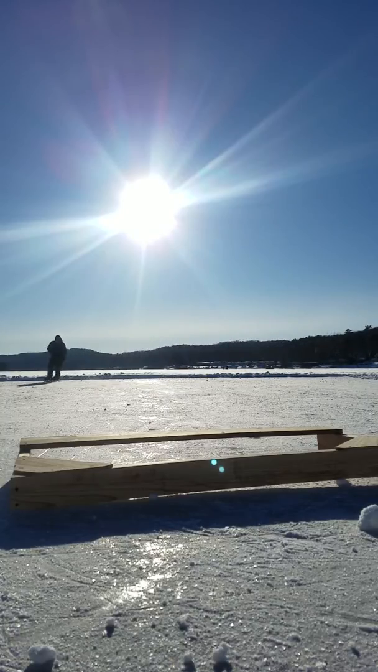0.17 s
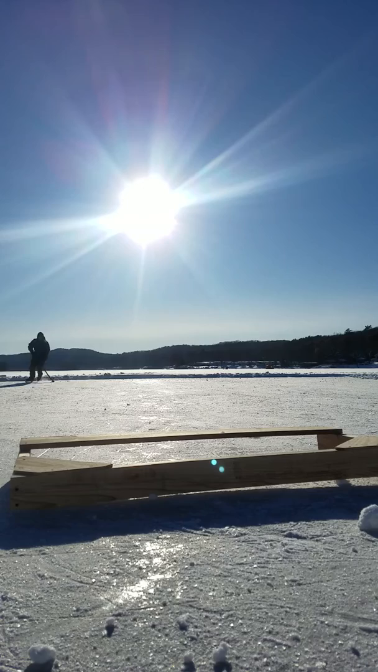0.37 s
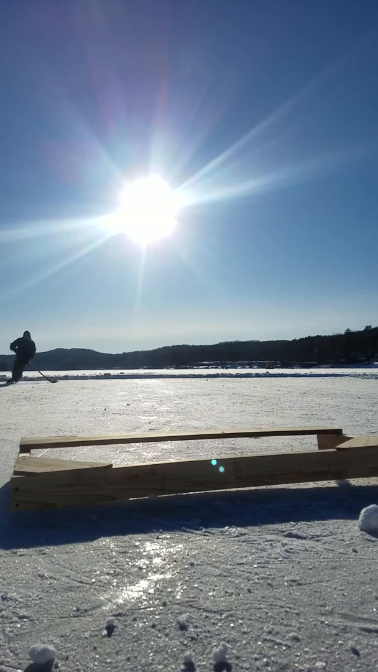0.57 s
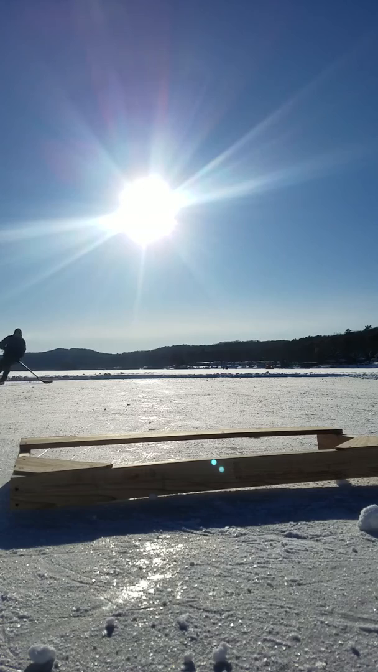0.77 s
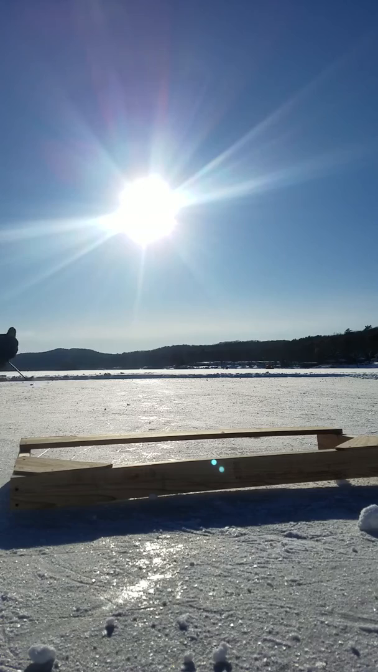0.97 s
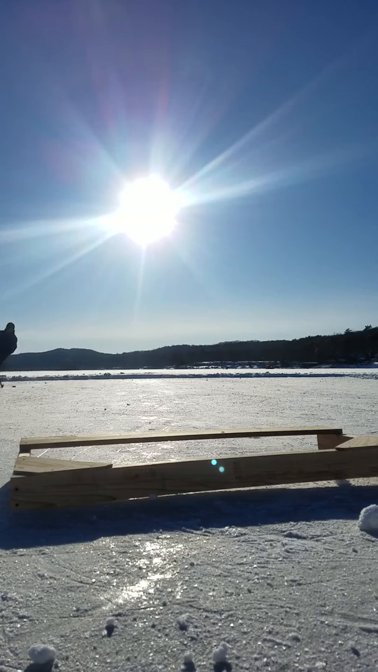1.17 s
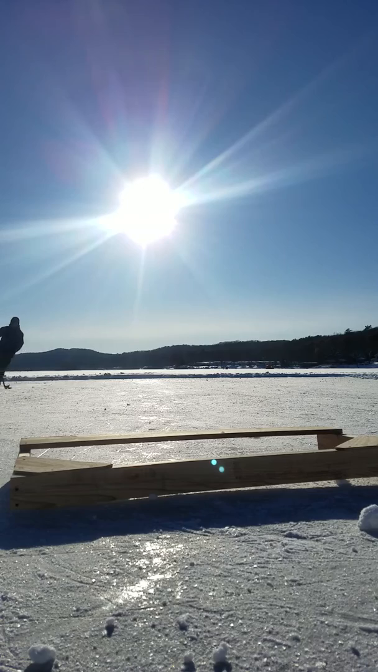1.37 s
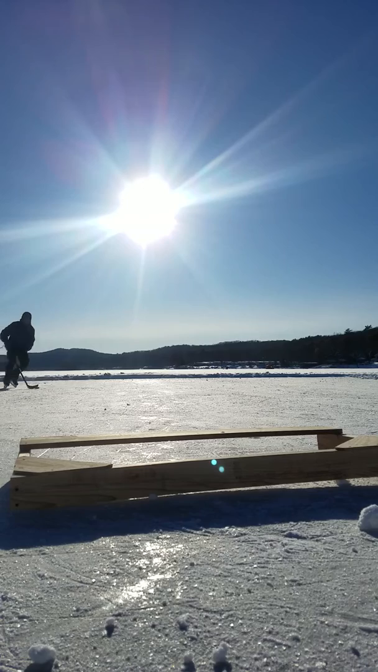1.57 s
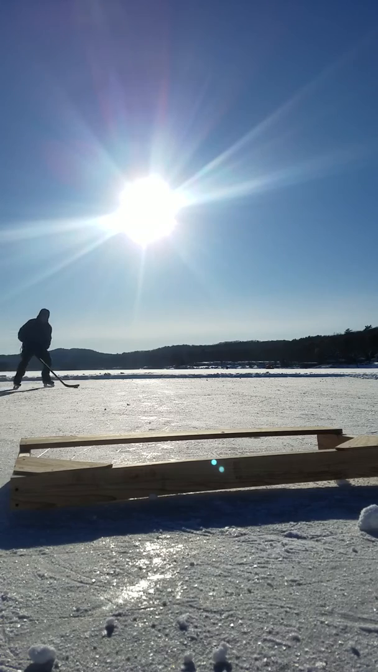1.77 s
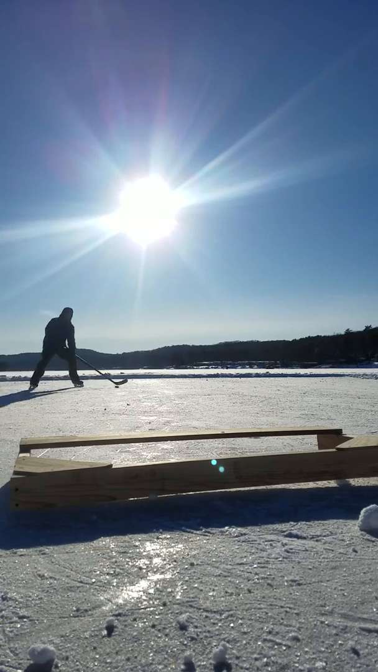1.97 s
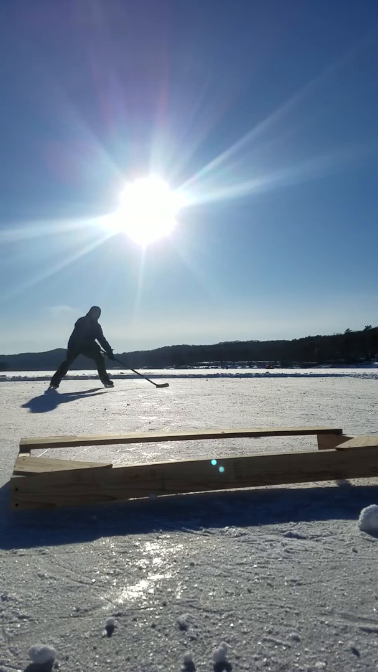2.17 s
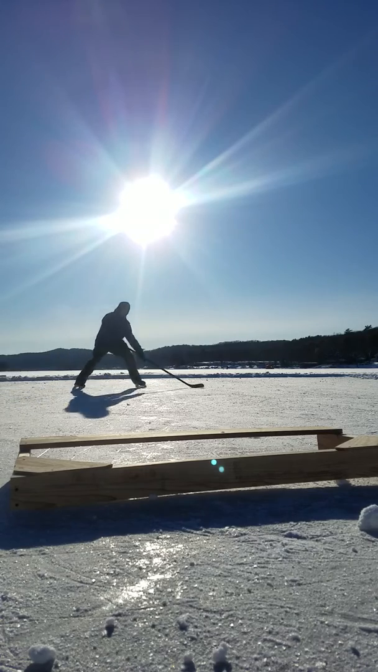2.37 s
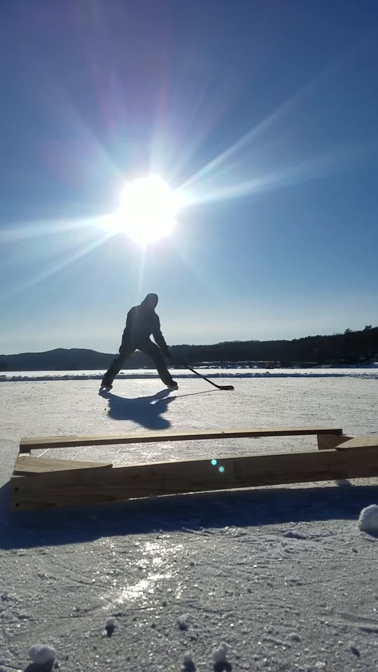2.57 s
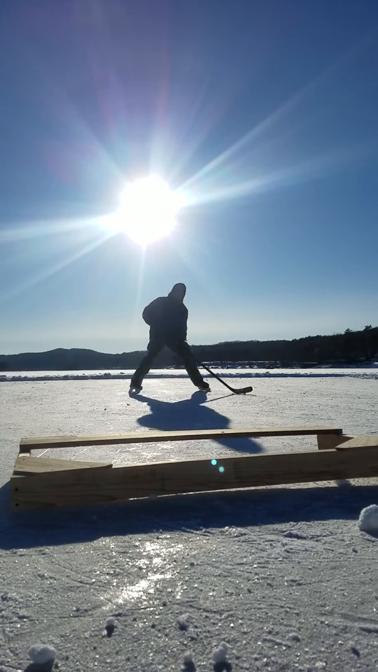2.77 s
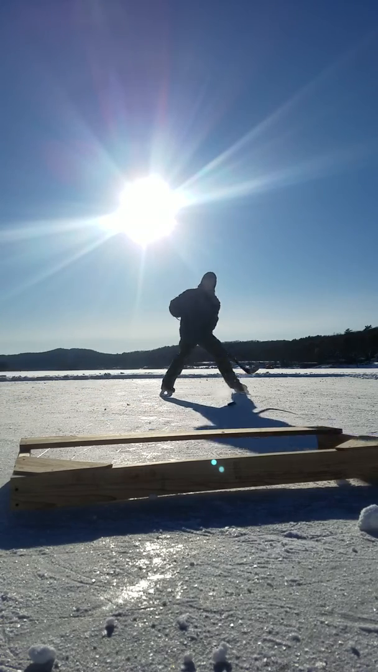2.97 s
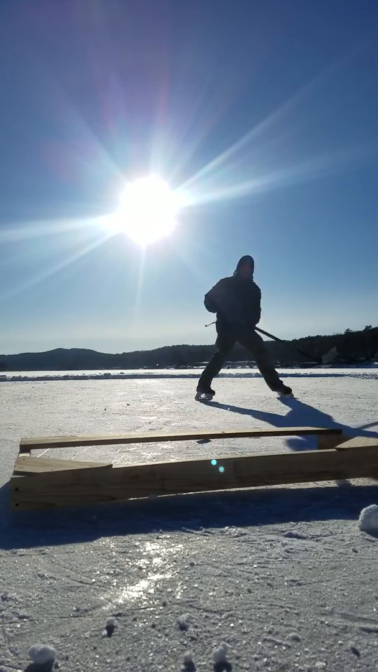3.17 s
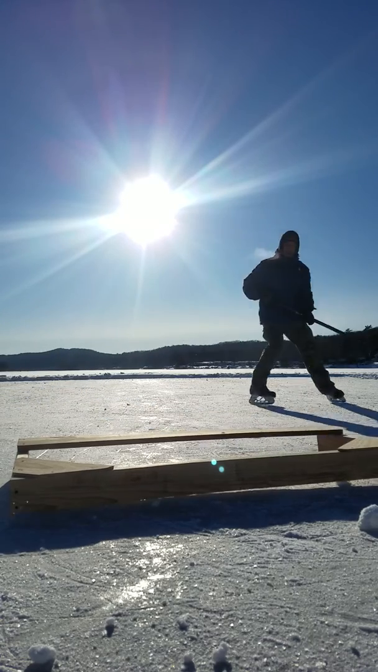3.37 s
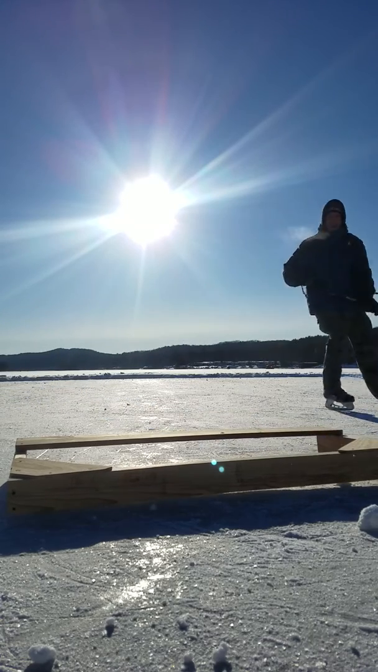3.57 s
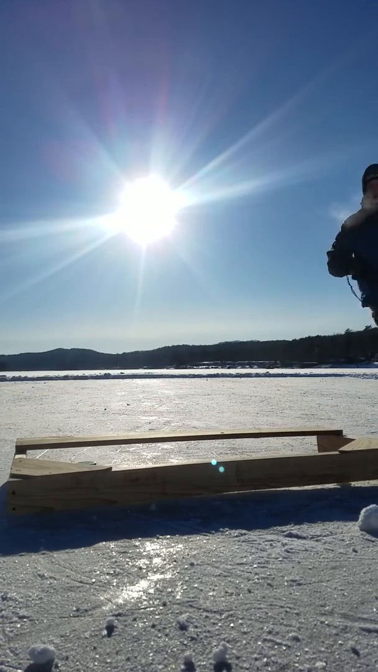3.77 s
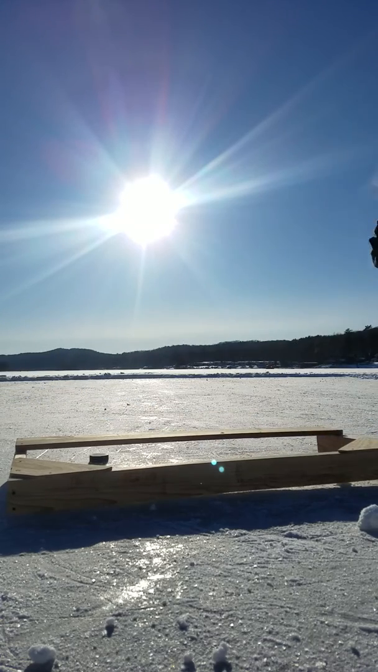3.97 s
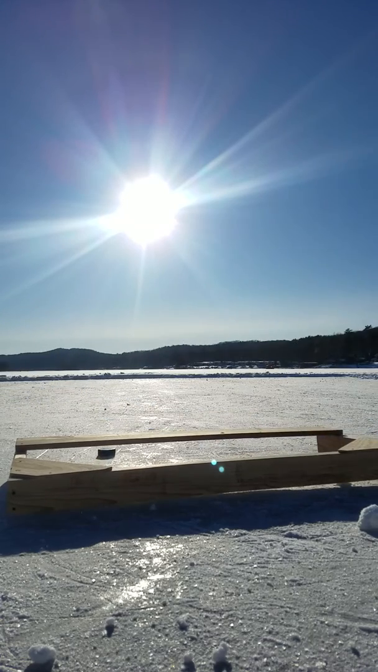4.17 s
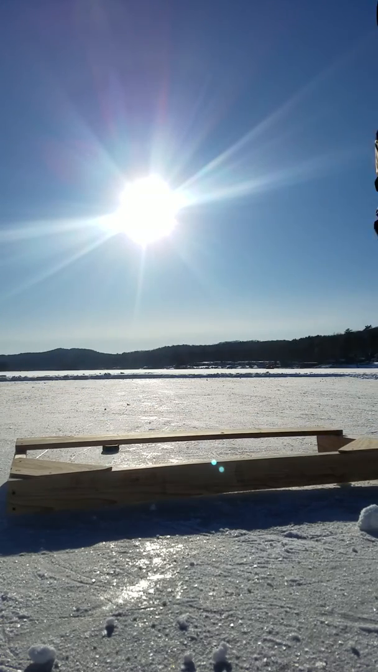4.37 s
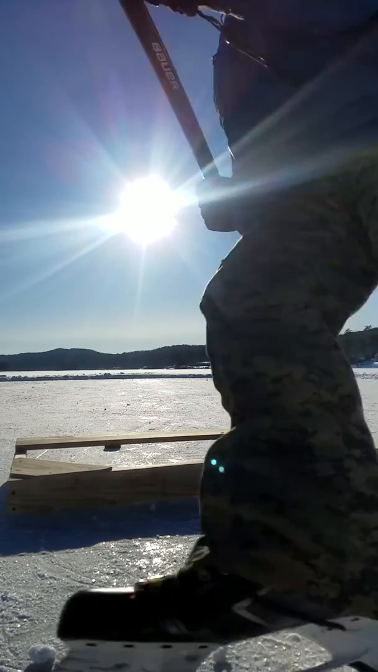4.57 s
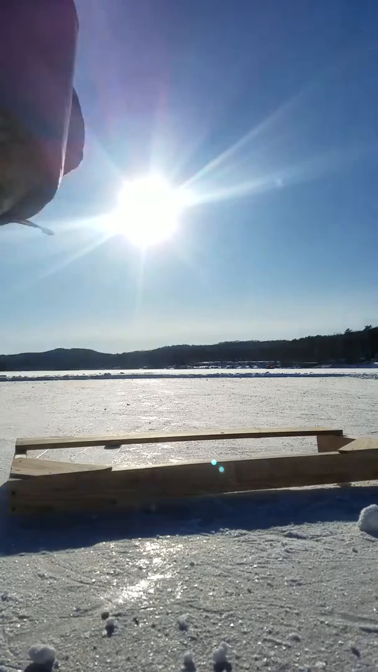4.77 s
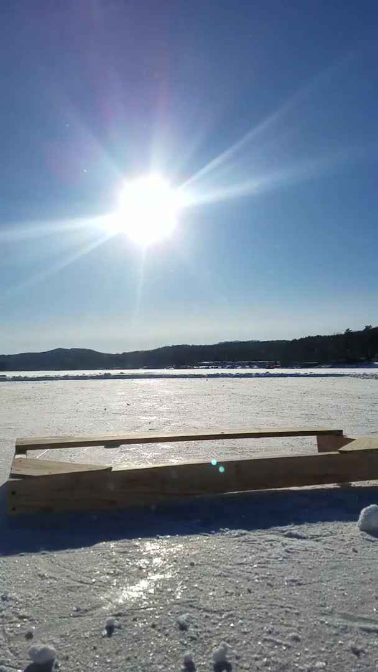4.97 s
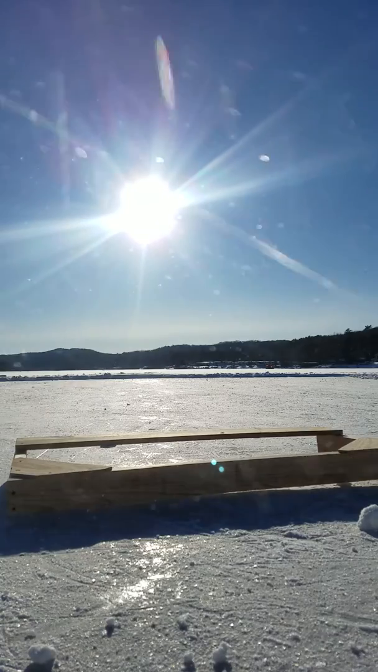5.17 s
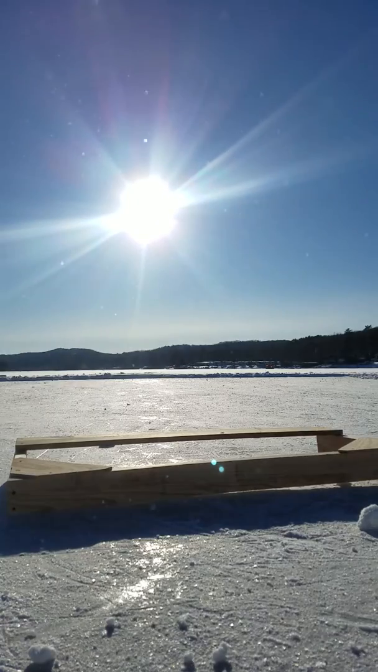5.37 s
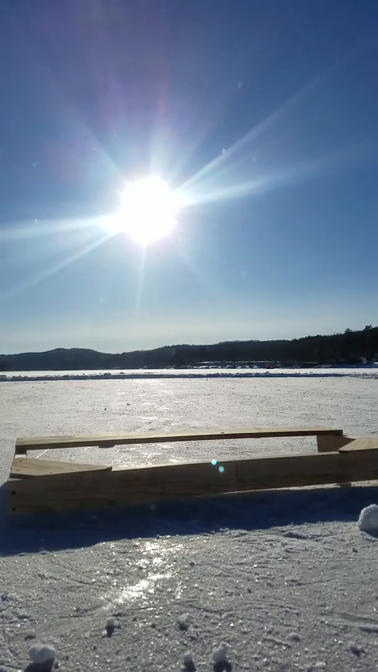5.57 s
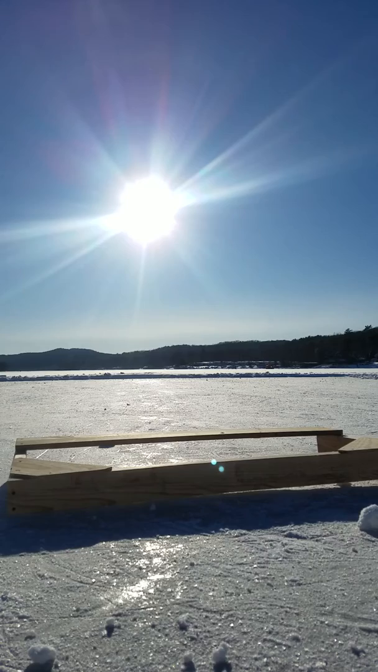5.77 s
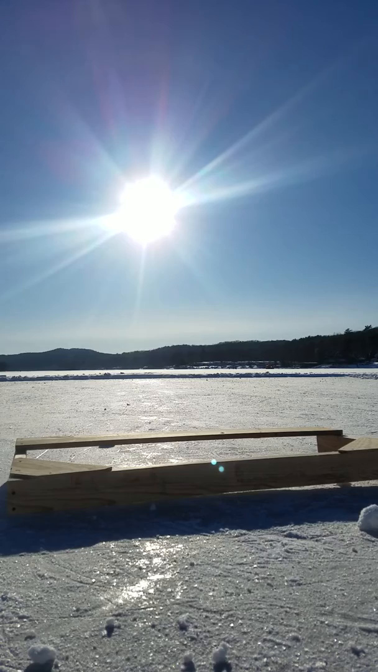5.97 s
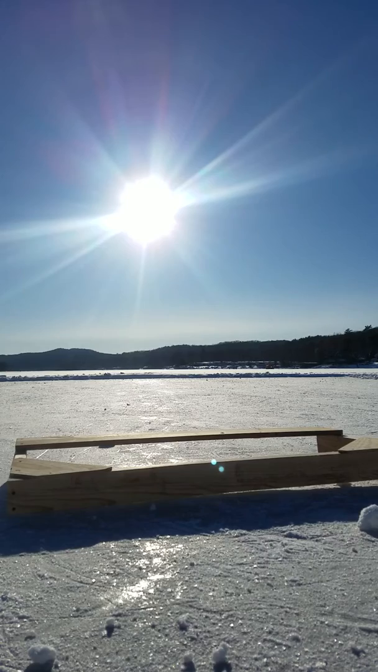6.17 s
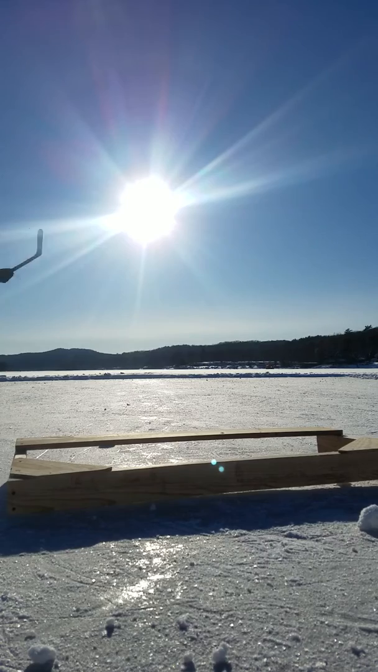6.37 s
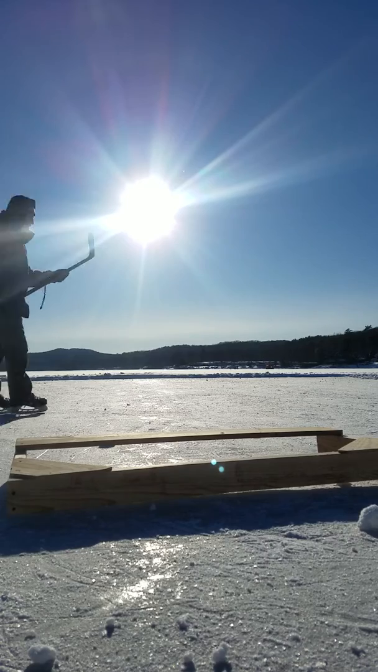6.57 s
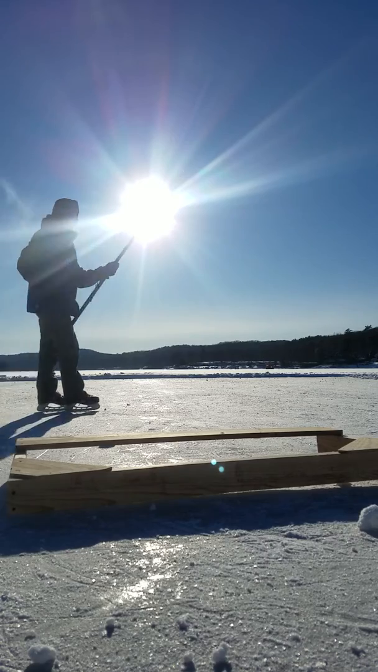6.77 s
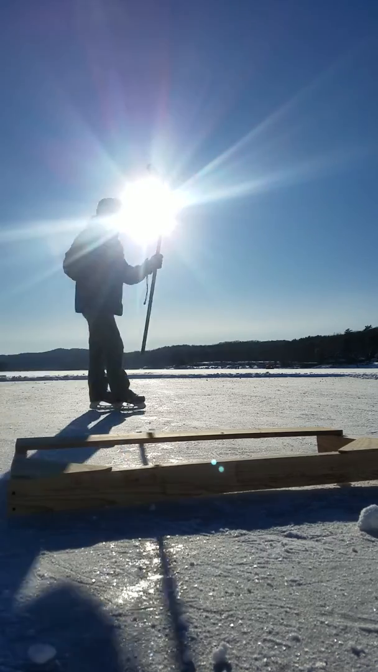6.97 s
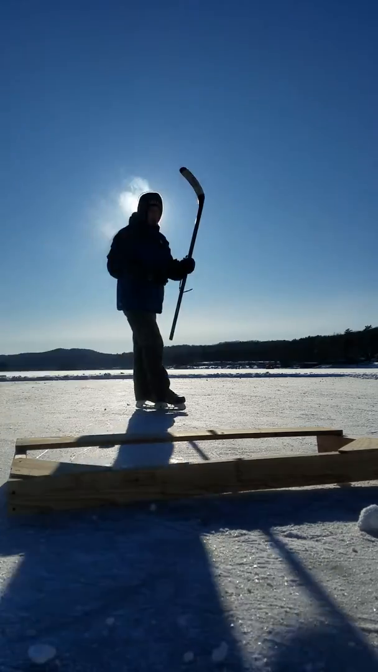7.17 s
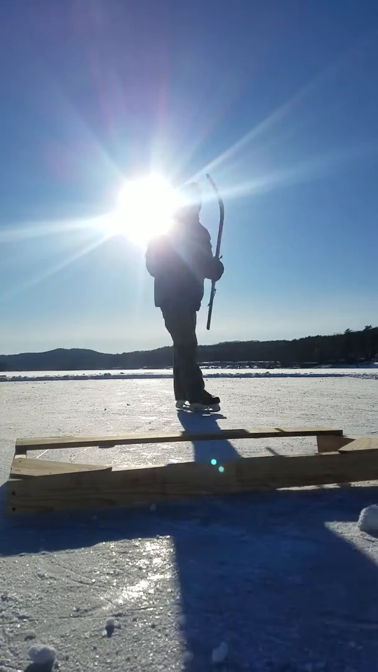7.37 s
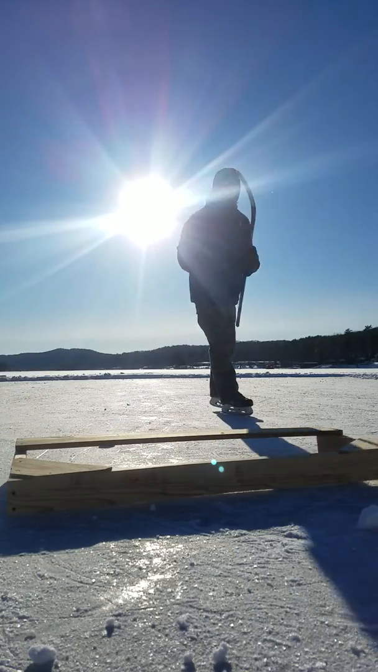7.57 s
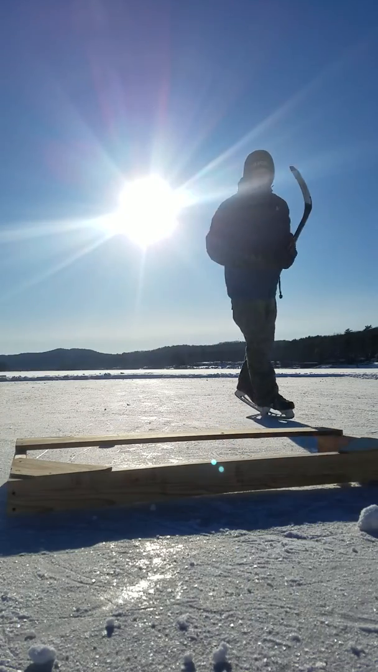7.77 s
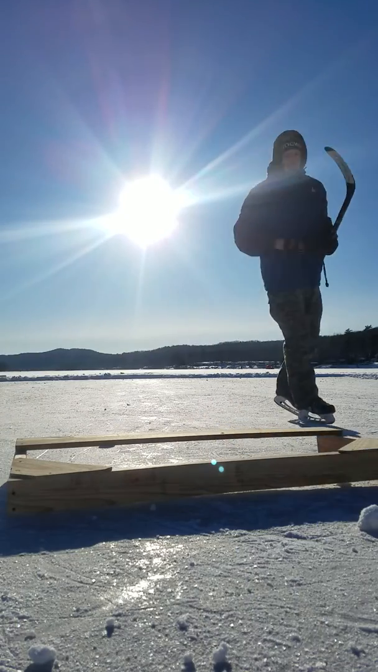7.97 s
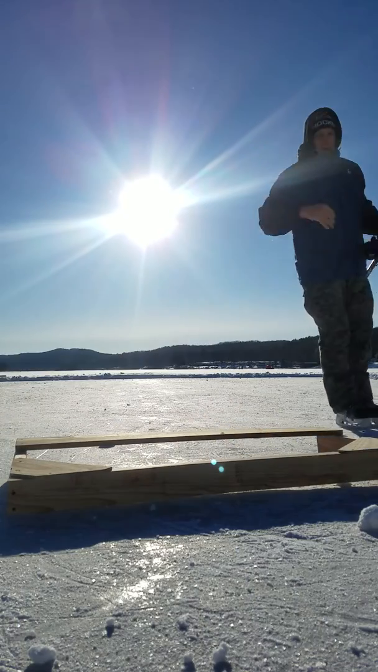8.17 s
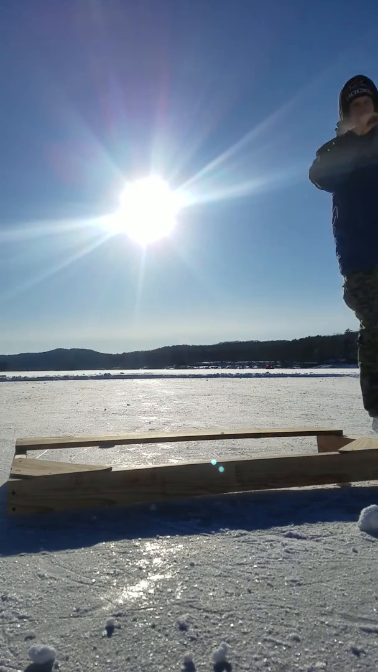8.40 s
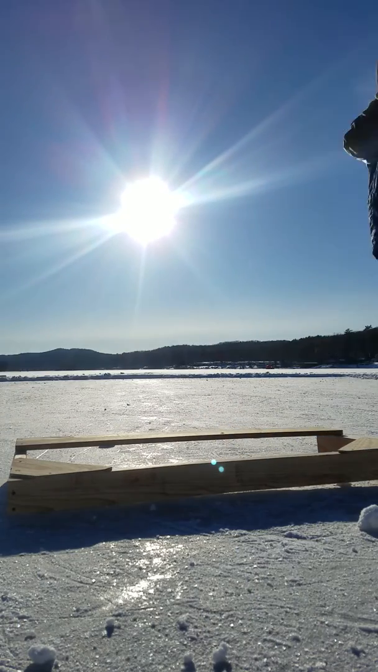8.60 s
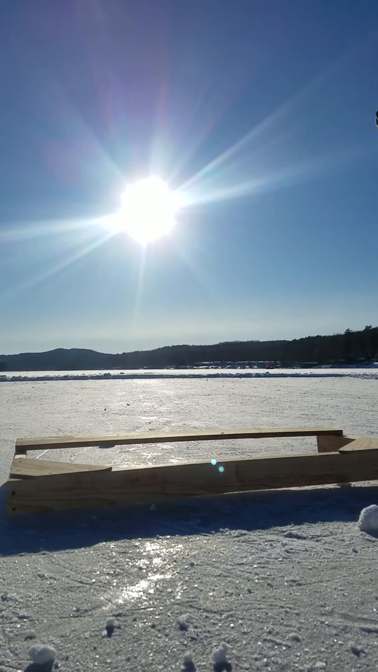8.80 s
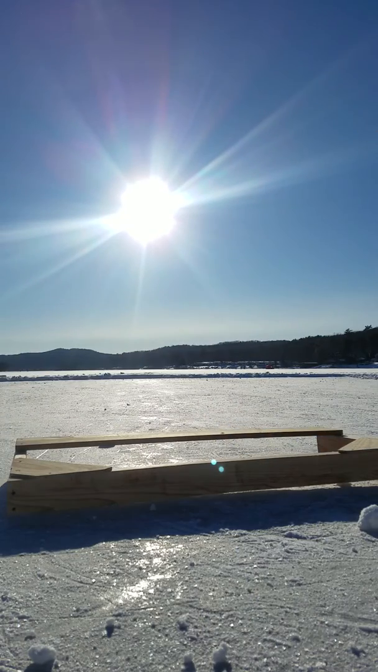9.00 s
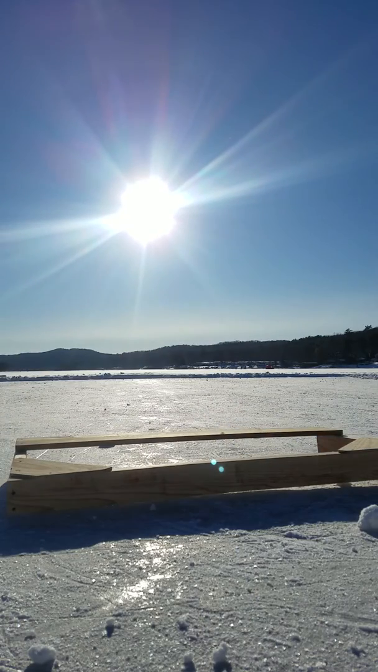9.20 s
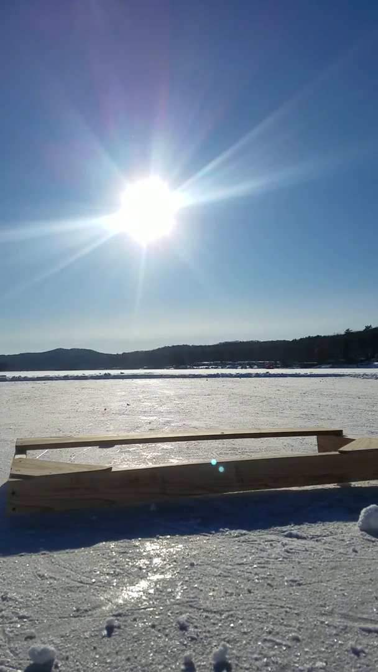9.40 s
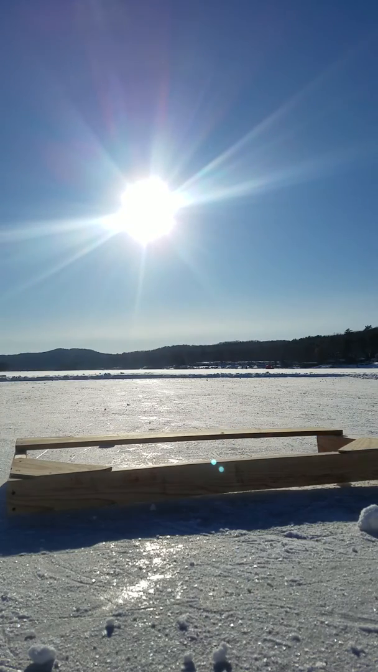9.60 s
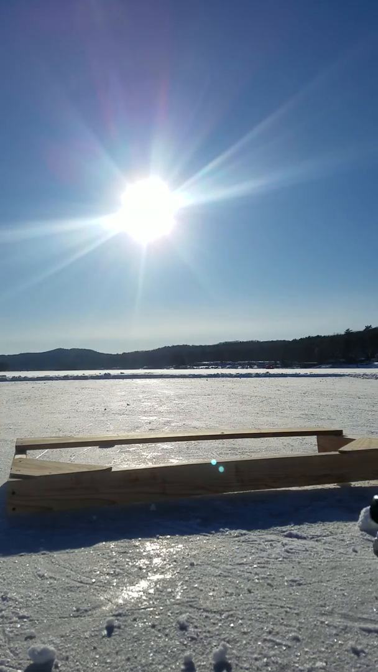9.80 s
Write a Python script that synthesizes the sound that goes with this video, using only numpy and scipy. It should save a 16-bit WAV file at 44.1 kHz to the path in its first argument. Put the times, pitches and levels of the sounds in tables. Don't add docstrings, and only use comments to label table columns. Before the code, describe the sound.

An open frozen lake, dry and echo-free, with faint low hiss and a light breeze. From 0 to 3.3 seconds a skater approaches: soft gritty blade strokes around 0.3, 0.7, 1.7 and 2.5, small ice clicks and bites, and a rapid, distant chatter at 0.9-1.5. At 3.35 a puck hits a wooden plank, a very loud, short hollow knock, with a weaker bounce at 3.47. After a brief lull, blades judder from 4.1 and carve into a loud, harsh, crunching stop peaking near 4.5-5.0, with chunks cracking. Scrapes and bites diminish through 6.5 while wind buffets low, mostly left, strongest around 5.5-5.9. About 6.7-7.6 is quiet, with a faint blade ring near 6.9 and tiny ticks. From 7.7 slow steps click, crackle and crunch; short, stuttering scrapes cluster at 8.6-9.5, then fade by 9.8.

```python
import sys
import numpy as np
from scipy import signal
from scipy.fft import rfft, irfft
from scipy.io import wavfile
from scipy.ndimage import uniform_filter1d, map_coordinates

SR = 44100
rng = np.random.default_rng(int(sys.argv[2]) if len(sys.argv) > 2 else 0)


def store_pcm(level_fs):
    pcm = np.round(np.clip(level_fs, -1, 1) * 32767).astype(np.int16)
    wavfile.write(sys.argv[1], SR, np.atleast_2d(pcm).T)


def attenuation_scalar(level_db):
    decades = np.asarray(level_db, float) / 20
    return 10 ** decades


N = 433944

# hardest moment in seconds,
# rise in seconds, fall in seconds, pressure in dB, weight on the ice sheet in dB.
STROKES = [(.34, 0.15, 0.27, -40.5, -1.5), (.74, 0.25, 0.17, -38.5, -1.5), (1.11, 0.27, 0.2, -43, 0),
           (1.28, 0.049, 0.5, -38.5, 0.5), (1.74, 0.12, 0.1, -39, 3.5), (2.15, 0.73, 0.29, -41.5, -3),
           (2.55, 0.46, 1, -39, -1), (3.15, 0.4, 0.4, -41, 2), (3.6, 0.16, 0.2, -59.5, 7),
           (3.82, 0.065, 0.072, -44.5, -4),
           (4.25, 0.16, 0.49, -22.5, -8.5), (4.52, 0.48, 0.41, -16, -4.5), (4.878, 0.17, 0.29, -23, 3),
                (5.02, 0.33, 0.08, -22.5, -2), (5.44, 0.35, 0.07, -26, -1), (5.32, 0.49, 0.22, -52, -0.5),
                (5.55, 0.18, 0.35, -31.5, -1.5), (6.17, 0.41, 0.13, -35.5, -1), (6.5, 0.9, 0.11, -43, -2),
                (6.65, 0.98, 0.22, -54, 3), (7.45, 1, 0.51, -62.5, 7), (7.778, 0.98, 0.036, -54.5, 6.5),
                (8.0, 0.22, 0.24, -63, 5), (8.151, 0.16, 0.12, -44.5, 13.5),
                (8.328, 0.025, 0.41, -39.5, 2.5), (8.6, 0.22, 0.12, -38.5, -9), (9.25, 1, 0.1, -36, -1.5),
                (9.58, 0.3, 0.13, -47.5, 1), (4.66, 0.19, 0.23, -27.5, 9), (9.84, 1, .2, -57, -18)]
# hardest moment in seconds, pressure in dB.
SKIPS = [(5.08, -27.5), (5.116, -33), (5.187, -31), (5.278, -28), (5.685, -40), (6.245, -43), (7.857, -60),
         (7.945, -43), (8.644, -37), (8.68, -35), (8.712, -35.5), (8.939, -38), (9.005, -27.5),
         (9.074, -35), (9.114, -32.5), (9.17, -29.5), (9.225, -29), (9.249, -30), (9.304, -29.5),
         (9.349, -32.5), (9.406, -32.5), (9.462, -34.5)]
# time in seconds, half length in seconds, change in dB.
LIFTS = [(4.045, 0.055, -6), (5.068, 0.0067, 1.5), (5.129, 0.0065, -8), (5.166, .01, 3),
         (5.502, 0.0052, -1.5), (5.655, 0.01, -7), (5.941, 0.011, -16), (6.116, .007, -2),
         (6.454, 0.0082, 0), (6.17, 0.004, -8), (6.488, 0.0087, -6), (7.865, 0.0053, -1),
         (8.334, 0.0067, -11), (7.645, 0.0073, -8), (7.83, 0.015, -7), (7.913, 0.008, -2),
         (7.933, .005, -8), (7.958, .008, -14), (8.237, 0.014, -8), (8.305, 0.015, -12),
         (8.402, 0.0073, -6), (8.454, 0.011, -10.5), (8.553, 0.0082, -10), (8.767, 0.03, -8),
         (8.818, 0.0079, -8), (8.873, 0.017, -10.5), (8.923, 0.0037, -12), (8.972, 0.0089, -4.5),
         (9.032, .005, -2), (9.046, .007, -9), (9.092, 0.0082, -4.5), (9.147, .006, -3), (9.271, .01, -9),
         (9.324, .005, -3), (9.383, 0.0084, -3.5), (9.443, 0.012, -5.5)]
# time in seconds, treble change with distance in dB, sideways skid in dB,
# chatter depth in dB, edge resonance in Hz.
SKATER = [(0, -7, -1, 5.5, 1250), (.7, -20, -12, 2.5, 1400), (1.1, -13, -11.5, 4, 1240),
          (2.2, -8.5, -4, 2.5, 1300), (2.6, -2.5, -3.5, 2.5, 1430), (3.3, -2.5, -3, 3.5, 1320),
          (3.85, -12.5, -11, 4, 1430), (4.25, -5, -10.5, 0.77, 1310), (4.65, 5, -4.5, 2, 1190),
          (4.95, 1, -10, 2, 1520), (5.6, -4.5, -11.5, 2.5, 1460), (6.1, 1, -7, 4, 1100),
          (6.8, -2, -2, 4, 1490), (7.75, -1, -2.5, 3, 1280), (8.15, -1, -7, 5.5, 1240),
          (8.75, 1.5, -2, 3.5, 1310), (9.15, 2, 0, 2, 1205), (9.84, 4, -0.5, 2, 1350)]
# factor on the edge resonance, width in Hz, level in dB.
EDGE = [(0.98, 480, 6.5), (0.56, 1300, -5.5)]
# pitch in Hz, width in Hz, level in dB.
RUMBLE = [(221, 266, 7.5), (422, 256, -1), (130, 530, -34)]
# pitch in Hz, width in Hz, level in dB.
SHAVING = [(1977, 520, 6.5), (2806, 990, 1), (3980, 2600, -8)]
# frequency in Hz, level in dB per Hz.
FIZZ = [(2650, 6), (4500, 7), (6990, 4), (9500, 4.5), (12500, 6.5), (15800, 1), (16300, -10), (16700, -32)]
# pitch in Hz, width in Hz, level in dB.
COAST_RING = [(660, 140, -50.5), (1790, 360, -55.5)]
# time in seconds, peak in dB, pitch
# in Hz.
BITES = [(.258, -23, 950), (.695, -12.5, 1400), (.823, -28, 1210), (.862, -29, 875), (1.266, -41, 1300),
         (1.533, -30, 966), (1.596, -31, 1430), (1.888, -33, 1120), (1.959, -23, 1030),
         (2.139, -17, 1100), (2.177, -28, 401), (2.294, -27, 1080), (2.73, -22.5, 806),
         (2.804, -17.5, 630), (3.02, -23, 490), (3.074, -27, 446), (3.112, -22, 1140),
         (3.184, -24, 1105), (3.225, -34, 1370), (3.255, -23.5, 1440), (3.297, -21.5, 1200),
         (3.6277, -40, 1480), (4.073, -23, 1340),
         (4.669, -7, 350), (4.699, -5.5, 353), (4.708, -8, 358), (4.737, -11.5, 624), (4.761, -7, 304),
              (4.82, -5, 420), (4.844, -9.5, 570), (4.933, -13.5, 1510), (5.003, -7, 331),
              (5.042, -11, 331),
         (4.684, -9, 1660), (4.789, -7.5, 910), (5.035, -22, 1180), (5.081, -14, 401),
              (5.098, -13, 1560), (5.149, -9, 1460), (5.183, -13.5, 1270), (5.268, -15.5, 404),
              (5.445, -10.5, 605), (5.52, -10.5, 1080), (5.55, -20.5, 1090), (5.633, -16, 450),
              (5.677, -15.5, 1200), (5.887, -26.5, 2300), (5.463, -8.5, 1510), (6.32, -28.5, 1620),
              (5.908, -25, 1140), (5.947, -20.5, 1080), (5.995, -21.5, 1050), (6.02, -19, 1150),
              (6.124, -17, 1500), (6.151, -17.5, 1330), (6.177, -12.5, 1160), (6.458, -16, 1970),
              (6.5, -16.5, 1200),
         (7.301, -23.5, 3350), (7.336, -26, 393), (7.658, -31, 1160), (7.706, -30.5, 2300),
              (7.845, -24, 503), (7.879, -20, 1360), (7.92, -17, 1300), (7.976, -20.5, 1200),
              (8.08, -11.5, 1300), (8.073, -27, 350), (8.097, -25, 320), (8.121, -27, 500),
              (8.156, -36, 320), (8.134, -20.5, 293), (8.2, -23, 302.5), (8.169, -21.5, 905),
              (8.189, -25.5, 1490), (8.322, -16, 1270), (8.348, -19.5, 1210), (8.384, -26, 1340),
              (8.423, -21, 470), (8.492, -22, 1420), (8.569, -24, 1260), (8.607, -15.5, 377),
              (8.474, -23.5, 496), (8.537, -24, 1200), (8.578, -22, 1270), (8.64, -21, 1200),
              (8.694, -24, 1440), (8.708, -24.5, 1300), (8.798, -18.5, 1270), (8.832, -19, 1500),
              (8.87, -25, 1280), (8.896, -17.5, 1820), (8.931, -20, 1790), (9.061, -20.5, 1270),
              (9.103, -20.5, 1850), (9.391, -36, 1240), (9.525, -35, 1270), (9.258, -13.5, 420),
              (9.417, -20, 1490), (9.218, -21.5, 401), (9.297, -17, 1200), (9.367, -20.5, 1380),
              (9.456, -20, 1230)]
# time in seconds, peak in dB, pitch in Hz.
CHATTER = [(0.921, -41, 1320), (0.9657, -30, 1480), (0.978, -33, 1400), (0.992, -30, 1380),
           (1.0066, -30, 1320), (1.0172, -25, 1270), (1.0384, -42, 1440), (1.0542, -25, 1340),
           (1.064, -25, 1260), (1.0828, -21, 1250), (1.0974, -35, 1360), (1.1142, -26, 1450),
           (1.121, -21, 1270), (1.1348, -29, 1220), (1.1538, -25, 1350), (1.1687, -32, 1220),
           (1.2032, -27.5, 1420), (1.218, -32, 1410), (1.2356, -30, 1440), (1.2663, -35, 1440),
           (1.281, -21, 1350), (1.3054, -27, 1330), (1.3409, -30, 1210), (1.3694, -30, 1460),
           (1.4067, -35, 1220), (1.4317, -29, 1300), (1.4604, -31, 1440), (1.476, -28, 1230),
           (1.4944, -34, 1230)]
# time in seconds, peak in dB, pitch in Hz.
JUDDER = [(4.1134, -23, 1330), (4.1238, -22, 1250), (4.146, -16, 1180), (4.1662, -12.5, 1240),
          (4.1939, -15, 1170), (4.2228, -12, 1180), (4.2734, -7, 1200), (4.3042, -12, 1350),
          (4.3311, -13, 1330), (4.355, -10, 1320), (4.377, -10, 1300), (4.391, -10, 1340),
          (4.4364, -5, 1360), (4.4685, -8, 1260), (4.5338, -3, 1120), (4.568, -11, 1120), (4.587, -8, 1340)]
# time in seconds, peak in dB, time to fade 60 dB in seconds.
TICKS = [(3.5039, -39, 0.03), (3.5379, -49, 0.03), (5.3028, -42, 0.013), (5.5694, -35, 0.03),
         (7.4729, -43, 0.03), (7.5138, -43, 0.033), (7.5732, -57, 0.028), (7.6116, -42, 0.037),
         (7.656, -31, 0.042), (7.7039, -33, 0.03), (7.7483, -54, 0.03), (7.7847, -58, 0.03),
         (7.8436, -26.5, 0.032), (7.8785, -30, 0.048), (7.9379, -39, 0.03), (8.0107, -40, 0.033),
         (8.0466, -41, 0.03), (8.079, -33, 0.018), (8.1389, -50, 0.027), (8.1683, -51, 0.024),
         (8.1843, -41, 0.025), (8.2117, -45, 0.033), (8.2214, -50, 0.025), (8.2576, -40, 0.012),
         (8.3165, -41, 0.033), (8.4716, -34, 0.03), (8.5944, -26.5, 0.043), (8.6248, -26, 0.03),
         (8.7854, -36, 0.042), (8.8303, -28, 0.03), (8.9141, -29, 0.015), (8.9286, -26, 0.033),
         (9.3244, -42, 0.03)]
# frequency in Hz, level in dB per Hz.
TICK = [(300, -35), (1500, 17), (4000, 6), (7000, -7.5), (12000, 3), (15800, -3), (16600, -6)]
# time in seconds, ring in dB, thud in dB, crack in dB,
# delay of the second touch in seconds, level of the second touch in dB.
KNOCKS = [
    (3.3476, 0.5, -1.5, -6, 0.019, -16),
    (3.4677, -7.5, -23, -44, .013, -3.5),
]
# pitch in Hz, level in dB, time to fade 60 dB in seconds.
BACK_PLANK = [(107, -13, .3), (175, -19.5, 0.45), (320, -3, 0.22), (361, -7.5, .3), (428, -16, .25),
              (510, -1, .18), (666, -1, .19), (755, -5, .1), (833, -21, .16), (890, -21, .13),
              (1180, -10, .09), (1490, -12, .08), (1850, -30, .07), (1970, -7, .05)]
# pitch in Hz, level in dB, time to fade 60 dB in seconds.
SIDE_PLANK = [(255, -18.5, .5), (407, -7, .26), (514, -4, .2), (560, 1, .12), (687, -12.5, .2),
              (842, -8.5, 0.083), (914, -7, 0.077), (1200, -19, .1), (1420, -18, .075), (2440, -34, .09)]
# strongest moment in seconds, level in dB, half length in seconds.
GUSTS = [(0.407, -42.5, 0.3), (0.826, -43, 0.16), (1.245, -33.5, 0.12), (2.858, -36.5, 0.099),
         (3.373, -50, 0.051), (4.677, -39, .14), (5.204, -30.5, 0.1), (5.375, -31, 0.21),
         (5.538, -21.5, 0.078), (5.639, -19.5, 0.15), (5.863, -18.5, 0.1), (6.31, -31, 0.076),
         (6.394, -29, 0.039), (6.656, -34, 0.051), (6.52, -29.5, 0.067), (6.768, -24.5, 0.069),
         (7.053, -35.5, 0.064), (7.308, -36, 0.23), (8.498, -29.5, 0.05), (8.852, -36, 0.05),
         (9.014, -45, 0.074), (9.152, -30, 0.16), (9.37, -33, 0.12), (9.602, -43, 0.056),
         (9.786, -36, 0.11)]
# time in seconds, level in dB.
BREEZE = [(0, -53), (1.5, -45), (2.8, -53), (3.35, -44.5), (3.78, -75), (4.3, -58), (6.3, -40.5),
          (7.4, -43.5), (8.4, -43), (8.8, -64), (9.84, -46)]
# frequency in Hz, level in dB per Hz.
BUFFET = [(8.8, -58), (15, -19), (48, 14.5), (147, 6), (196, -11.5), (231, -3.5), (300, -29), (400, -17),
          (520, -46), (880, -120)]
# frequency in Hz, level in dB per Hz.
HISS = [(59, -40), (100, 2), (174, 0.5), (794, -17), (1410, -17.5), (5320, -36), (15100, -45.5),
        (16500, -52)]
# frequency in Hz, gain in dB.
LOW_CUT = [(20, -29), (75, -7), (115, -1.5), (160, 0)]
# frequency in Hz, gain in dB.
TOP = [(15700, 0), (15950, -32), (16500, -50)]
# frequency in Hz, left over right in dB.
PORTS_DB = [(60, 3), (150, 0.5), (380, -0.5), (950, 2.0), (2380, 4.5), (5980, 17), (15000, 31.5)]
# frequency in Hz, likeness from 0 to 1.
SAME = [(60, 1), (300, 0.95), (1000, 0.87), (2500, 1), (6000, 0.21), (15000, 0.051)]
# time in seconds, lead of the left port in milliseconds.
LEAD = [(0, 0.13), (3, 0.12), (4.25, 0.057), (4.75, -0.03), (5.25, 0.051), (5.75, 0.11), (7.5, 0.1),
        (9, 0.071), (9.84, 0.018)]

COAST_DB = -55.5
SKIP_POWER = 1.55
CHIP_SAMPLES = 2048


def evened(x):
    return x / np.sqrt(np.mean(x ** 2, -1, keepdims=True) + 1e-20)


def read(points, hz):
    f, value = np.transpose(points)
    return np.interp(np.log(hz + 1), np.log(f + 1), value)


def over_time(rows):
    s, *columns = np.transpose(rows)
    return [np.interp(np.arange(N) / SR, s, c) for c in columns]


def add(mix, s, sound):
    part = mix[..., round(s * SR):][..., :sound.shape[-1]]
    part += sound[..., :part.shape[-1]]


def colour(x, points):
    size = x.shape[-1]
    gain = attenuation_scalar(read(points, np.fft.rfftfreq(size, 1 / SR)))
    return irfft(rfft(x) * gain, size)


def steep(x, hz, width):
    turn = np.exp(2j * np.pi * np.cumsum(hz * np.ones(x.shape[-1])) / SR)
    r = np.exp(-np.pi * width / SR)
    smooth = signal.lfilter([1], [1, -2 * r, r * r], x * turn.conj())
    return evened((turn * smooth).real)


def swell(s, rise, fall, power=1.754):
    t = np.arange(0, N, 64) / SR - s
    distance = np.where(t < 0, -t / rise, t / fall)
    return attenuation_scalar(2 * -24.5 * distance ** power)


def power_db(power):
    return np.repeat(10 * np.log10(power), 64)[:N]


def strokes():
    pushes = []
    for s, rise, fall, db, weight_db in STROKES:
        pushes.append((attenuation_scalar(2 * db) * swell(s, rise, fall), attenuation_scalar(2 * weight_db)))
    for s, db in SKIPS:
        pushes.append((attenuation_scalar(2 * db) * swell(s, 0.036, 0.031, SKIP_POWER), attenuation_scalar(2 * 0.5)))
    edge_db = power_db(attenuation_scalar(2 * COAST_DB) + sum(push for push, _ in pushes))
    rumble_db = power_db(attenuation_scalar(2 * COAST_DB) + sum(push * weight for push, weight in pushes))
    far_db, skid_db = over_time(SKATER)[:2]
    spray_hangs_s = 0.033
    pressure_db = uniform_filter1d(edge_db, int(spray_hangs_s * SR))
    fizz_db = -28 + far_db + 0.64 * pressure_db
    return edge_db, rumble_db, edge_db + skid_db, fizz_db


def jolts(per_s, rise_s, decay_s, spread_db):
    kicks = (rng.random(N) < per_s / SR) * attenuation_scalar(spread_db * np.minimum(rng.exponential(1, N), 3))
    env = signal.lfilter([1], [1, -np.exp(-1 / (decay_s * SR))], kicks)
    env = uniform_filter1d(env, int(rise_s * SR))
    log_env = np.log(abs(env) + 0.14 * env.mean())
    return evened(log_env - log_env.mean())


def blades(edge_db, rumble_db, shaving_db, fizz_db):
    depth_db, hz = over_time(SKATER)[2:]
    depth_db = np.clip(depth_db, 0, 7)
    bumps = jolts(per_s=70, rise_s=0.0023, decay_s=0.0017, spread_db=-2.5)
    chips = jolts(per_s=300, rise_s=0.00022, decay_s=0.00077, spread_db=4.0)
    gate = attenuation_scalar(depth_db * (bumps + 1.07 * chips))
    gate /= np.sqrt(uniform_filter1d(gate ** 2, SR // 12))
    grit = rng.standard_normal((2, N))
    slips = grit * gate
    rocking = evened(uniform_filter1d(rng.standard_normal(N), 900))
    hz = hz * (1 + 0.048 * depth_db * rocking)

    edge, shaving = 0, 0
    for k, (factor, width, db) in enumerate(EDGE):
        edge = edge + (-1) ** k * attenuation_scalar(db) * steep(slips, factor * hz, width)
    for k, (f, width, db) in enumerate(SHAVING):
        shaving = shaving + (-1) ** k * attenuation_scalar(db) * steep(slips, f * np.sqrt(hz / 1300), width)
    rumble = sum(attenuation_scalar(db) * steep(grit * gate ** 1.01, f, width * 1.66) for f, width, db in RUMBLE)
    fizz = colour(grit * gate ** 0.83, FIZZ)

    coast_db = power_db(swell(6.9, 0.53, 0.26, SKIP_POWER) + 1e-12)
    song = sum(attenuation_scalar(db + coast_db) * steep(grit, f, width) for f, width, db in COAST_RING)
    layers = (edge_db, edge), (rumble_db, rumble), (shaving_db, shaving), (fizz_db, fizz)
    return song + sum(attenuation_scalar(db) * evened(layer) for db, layer in layers)


def lifted():
    t = np.arange(0, N, 64) / SR
    change_db = sum(db * np.exp(-((t - s) / half) ** 4) for s, half, db in LIFTS)
    return attenuation_scalar(np.repeat(change_db, 64)[:N])


def bite(peak_db, hz, t60, spray_db, grit):
    t = np.arange(grit.shape[-1]) / SR - .002
    burst = grit * attenuation_scalar(-60 * t / np.clip(t60, .004, .08)) * (t > 0)
    burst[:, np.argmax(t > 0)] = 6.8
    body = steep(burst, hz, 640) + 0.34 * steep(burst, 1.455 * hz, 800)
    body += 0.59 * steep(burst, 310, 450)
    body += attenuation_scalar(spray_db - 7.0) * steep(burst, 3290, 1000)
    spray = colour(burst, FIZZ)
    return attenuation_scalar(peak_db) * (body / abs(body).max() + attenuation_scalar(spray_db) * spray / abs(spray).max())


def bites(edge_db, rumble_db, shaving_db, fizz_db):
    out = np.zeros((2, N))
    far_db = over_time(SKATER)[0]
    for s, db, hz in BITES:
        i = round(s * SR)
        spray_db = fizz_db[i] - edge_db[i] + 2 + 0.9 * far_db[i]
        top_hz = np.clip(14900 * attenuation_scalar(0.27 * far_db[i]), 2 * hz, .45 * SR)
        chip = bite(db, hz, 0.021, spray_db, rng.standard_normal((2, CHIP_SAMPLES)))
        add(out, s - .0025, signal.lfilter(*signal.butter(N=2, Wn=top_hz, fs=SR), chip))
    return out


def chatter():
    out, t = np.zeros((2, N)), np.arange(CHIP_SAMPLES) / SR - .002
    touch = attenuation_scalar(-60 * t / 0.016) * np.clip(t / 0.00079, 0, 1)
    dull = signal.butter(N=3, Wn=3540, fs=SR)
    for s, db, hz in CHATTER + JUDDER:
        burst = rng.standard_normal((2, CHIP_SAMPLES)) * touch
        ring = steep(burst, hz, 340) + 0.35 * steep(burst, 1.68 * hz, 600)
        ring += 0.067 * steep(burst, 2.18 * hz, 590) + 0.33 * steep(burst, 430, 420)
        ring = signal.lfilter(*dull, ring)
        add(out, s - .003, attenuation_scalar(db) * ring / abs(ring).max())
    return out


def splinters():
    out, t = np.zeros((2, N)), np.arange(CHIP_SAMPLES) / SR - .002
    for s, db, t60 in TICKS:
        fade = attenuation_scalar(-60 * t / np.clip(t60, .004, .08)) * (t > 0)
        burst = rng.standard_normal((2, CHIP_SAMPLES)) * fade
        burst[:, np.argmax(t > 0)] = 4.6
        tick = colour(burst, TICK)
        add(out, s - .002, attenuation_scalar(db + 4.5) * tick / abs(tick).max())
    return out


def knocks():
    out, t = np.zeros(N), np.arange(SR // 2) / SR
    wood = signal.butter(N=3, Wn=[70, 2770], btype="band", fs=SR, output="sos")
    slap = 1 + attenuation_scalar(7.5 - 60 * t / .04)
    contact = 1 - np.exp(-t / 0.00098)
    for (s, ring_db, thud_db, crack_db, later, again_db), modes in zip(KNOCKS, (BACK_PLANK, SIDE_PLANK)):
        ring = 0
        for hz, db, tail in modes:
            ring = ring + attenuation_scalar(db - 60 * t / min(tail, 90 / hz)) * np.sin(2 * np.pi * hz * t)
        rattle = rng.standard_normal(len(t))
        thud = steep(rattle * attenuation_scalar(-60 * t / 0.21), 460, 550)
        thud += 0.5 * steep(rattle * attenuation_scalar(-60 * t / 0.029), 1360, 1000)
        body = attenuation_scalar(ring_db) * ring / abs(ring).max() + attenuation_scalar(thud_db) * thud / abs(thud).max()
        body = signal.sosfilt(wood, body * contact * slap)
        crack = steep(rattle * attenuation_scalar(-60 * (t / 0.013) ** 2), 3400, 2000)
        add(out, s, body + attenuation_scalar(crack_db) * crack / abs(crack).max())
        add(out, s + later, attenuation_scalar(again_db) * body)
    return np.array([out, out])


def wind():
    slow = uniform_filter1d(rng.standard_normal((2, N)), 900)
    lumps = evened(uniform_filter1d(slow, 900))
    air = evened(colour(rng.standard_normal((2, N)) * attenuation_scalar(2.0 * lumps), BUFFET))
    gusts_db = power_db(sum(attenuation_scalar(2 * db) * swell(s, half, half) for s, db, half in GUSTS) + 1e-12)
    gust_colour = [(1.238 * hz, db) for hz, db in BUFFET]
    rush = evened(colour(rng.standard_normal((2, N)) * attenuation_scalar(3.1 * lumps), gust_colour))
    left_right_db = np.array([[5.], [-14.]])
    return (attenuation_scalar(over_time(BREEZE)[0]) * air + attenuation_scalar(gusts_db) * rush) * attenuation_scalar(left_right_db)


def far_hiss():
    return attenuation_scalar(-53.5) * evened(colour(rng.standard_normal((2, N)), HISS))


def ports(x):
    hz = np.fft.rfftfreq(N, 1 / SR)
    a, b = rfft(x)
    ratio = attenuation_scalar(read(PORTS_DB, hz))
    same = np.clip(read(SAME, hz), 0, 1)
    mixed = same * a + np.sqrt(1 - same ** 2) * b
    left, right = irfft(2 * np.array([a * ratio, mixed]) / (1 + ratio), N)
    when = np.arange(N) - over_time(LEAD)[0] * SR / 1000
    return np.array([left, map_coordinates(right, [when], order=3)])


def scene():
    levels = strokes()
    steady = colour(lifted() * blades(*levels) + far_hiss(), TOP)
    ice = steady + bites(*levels) + chatter() + splinters()
    return ports(colour(ice, LOW_CUT) + knocks()) + wind()


def band_limit(x):
    return signal.sosfilt(signal.butter(12, 16680, fs=SR, output="sos"), x)


def record(dry):
    mix = dry / (1 + abs(dry / 1.22) ** 6) ** (1 / 6)
    return band_limit(mix)


dry = scene()
out = record(dry)
store_pcm(out)
```